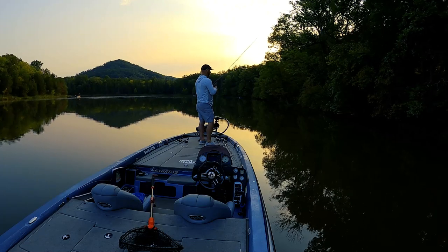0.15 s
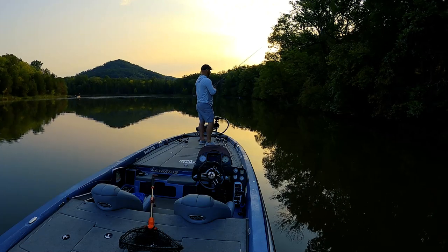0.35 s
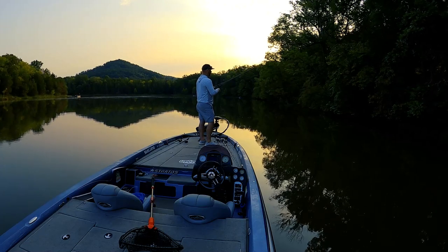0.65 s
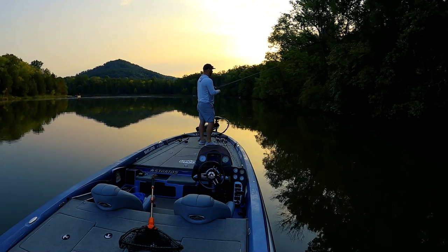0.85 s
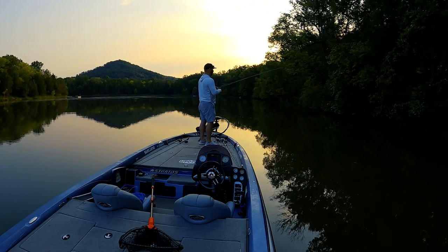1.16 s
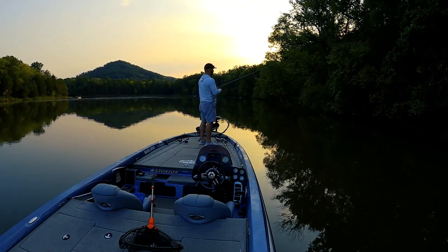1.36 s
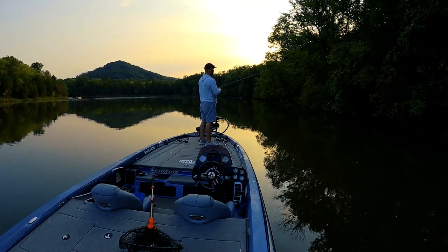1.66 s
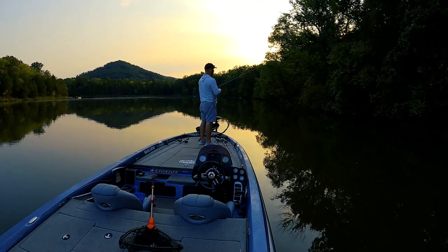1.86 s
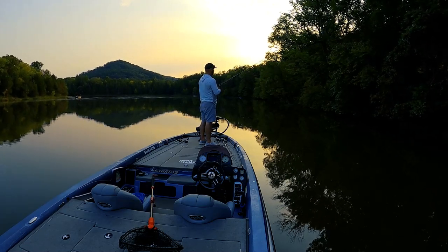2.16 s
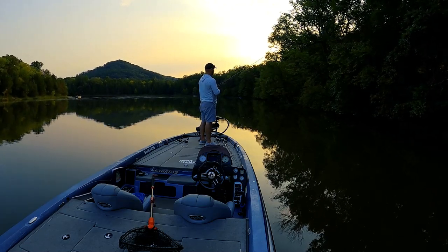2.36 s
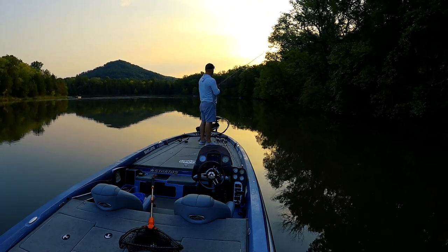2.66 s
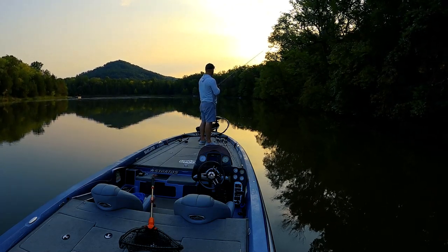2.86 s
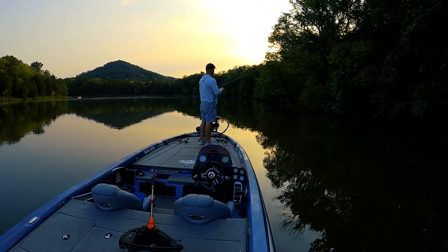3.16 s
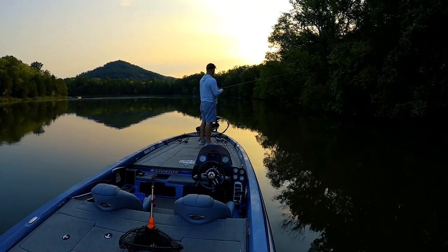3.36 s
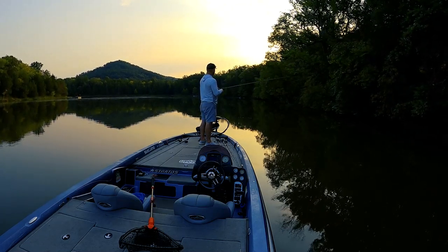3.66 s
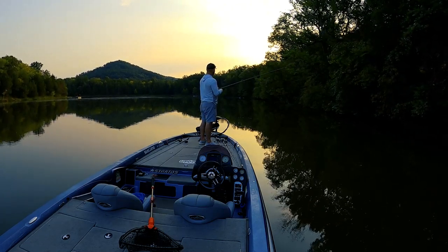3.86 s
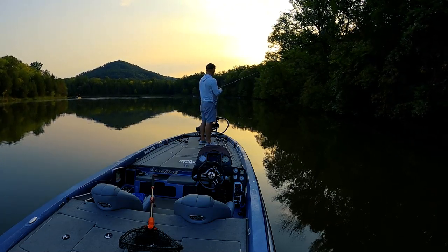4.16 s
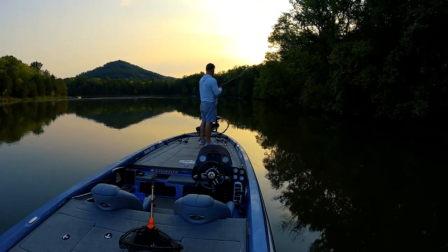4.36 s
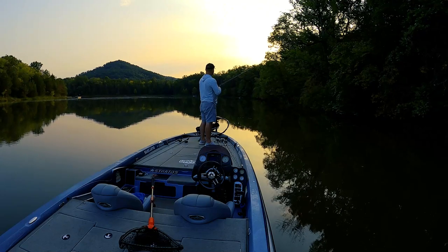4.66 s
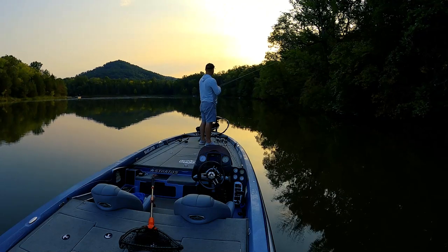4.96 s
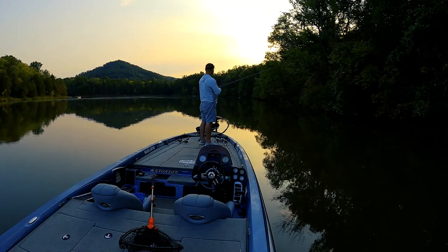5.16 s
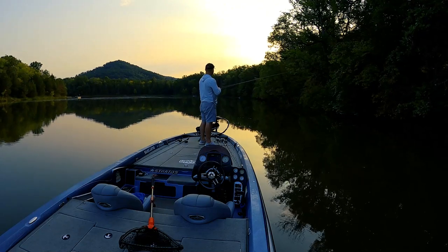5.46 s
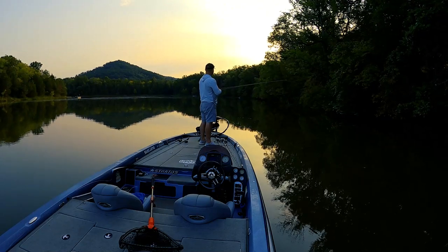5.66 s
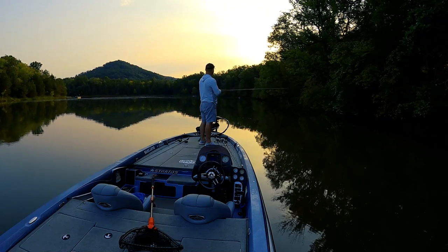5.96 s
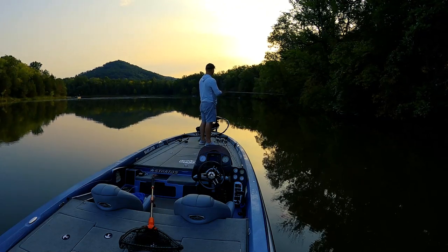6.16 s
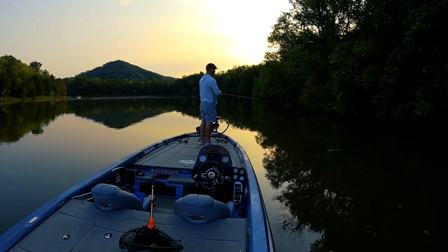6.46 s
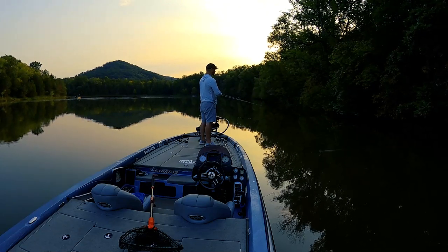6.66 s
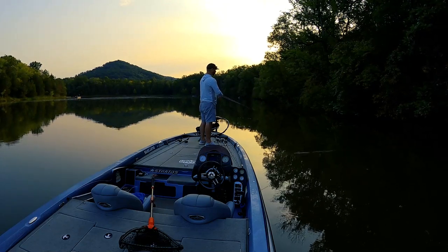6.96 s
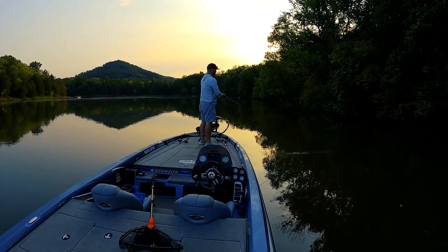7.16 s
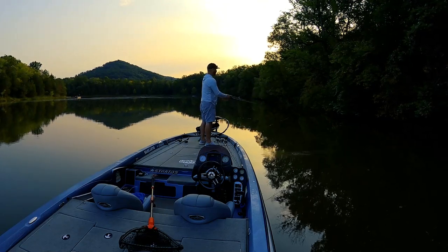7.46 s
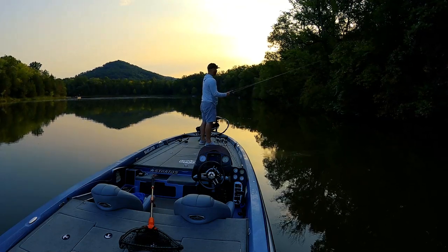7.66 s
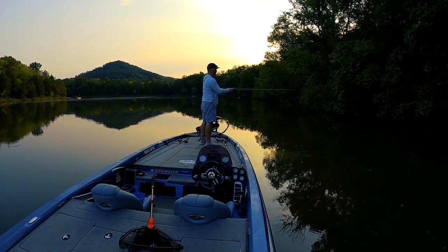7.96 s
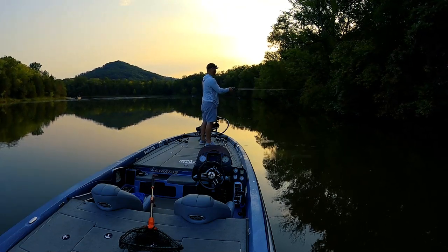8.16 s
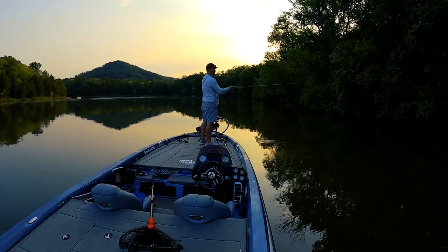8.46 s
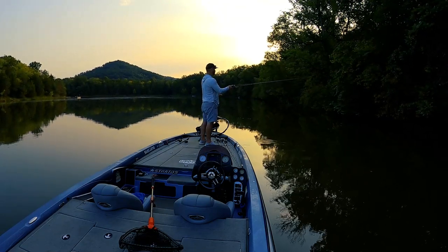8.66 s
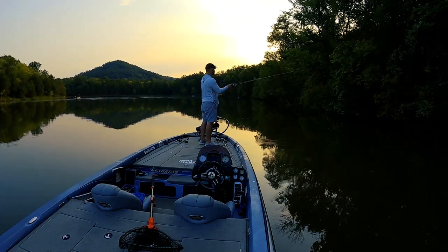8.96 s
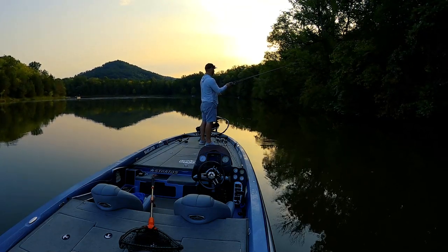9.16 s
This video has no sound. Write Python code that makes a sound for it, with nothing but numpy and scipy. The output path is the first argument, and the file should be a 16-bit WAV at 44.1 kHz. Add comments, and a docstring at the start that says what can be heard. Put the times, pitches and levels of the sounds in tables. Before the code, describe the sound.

A steady high insect chorus, scattered bird calls and low distant rumble, then a small splash, reel clicks and a fishing cast close by.

```python
"""Crickets and katydids scrape their wings all along a wooded lake shore at dusk, heard in stereo
from a fishing boat on calm water. Close by on the bow an angler lifts the lure out with a splash, clicks
the reel and casts again: the line hisses and the rod swishes. A jay and small songbirds call from
the trees to the left, and a far motor hums and rumbles over the water, under a hush of evening air."""
import sys
import numpy as np
from scipy import signal
from scipy.fft import rfft, irfft
from scipy.io import wavfile
from scipy.ndimage import uniform_filter1d

SR = 44100
rng = np.random.default_rng(int(sys.argv[2]) if len(sys.argv) > 2 else 0)


def put_to_file(sound):
    """Save the sound as 16-bit audio at rate SR, in the file named by the first command-line argument."""
    columns = np.atleast_2d(sound).T  # one column per channel
    safe = np.clip(columns, -1, 1)
    whole_steps = np.round(safe * 32767)
    wavfile.write(sys.argv[1], SR, whole_steps.astype(np.int16))


N = 410571
TIME = np.arange(N) / SR
FREQS = np.maximum(np.fft.rfftfreq(N, 1 / SR), 1)
# eddies off the rod tip, back swing then forward swing: time_s, tip_hz, whistle_db
ROD_SWING = [(7.645, 6800, -65), (7.69, 9560, -63.5), (7.755, 12800, -72), (7.81, 10220, -63.5),
             (7.85, 8360, -64), (7.9, 10150, -58.5), (7.95, 14400, -65.5), (8.06, 7900, -70)]


def insects():
    """Countless wings on the far shore merge into a shimmer; nearer crickets chirp almost pure tones."""
    # spectrum of the chorus: frequency_hz, level_db
    chorus = [(3700, -58), (4150, -17.5), (4500, -5.5), (4850, 2.5), (5250, 3), (5650, 1.5), (6600, -7),
              (7000, -16), (7600, -25), (8500, -54)]
    # nearer crickets: pitch_hz, chirps_per_s, level_db, pan_db
    crickets = [(5140, 7.3, -68.5, -6.5), (5300, 11, -70.5, -0.5), (5560, 14, -71, 4), (6470, 5, -80, 3)]
    out = noise(at_hz(chorus), likeness=0.36) * from_db(-54.5 + 0.7 * drift(15))
    for hz, chirps_per_s, level_db, pan_db in crickets:
        chirps = np.maximum(np.sin(phase_of(chirps_per_s * (1 + 0.1505 * drift(4)))), 0)
        tones = np.array([np.sin(phase_of(hz * (1 + .006 * drift(25)))) for side in range(2)])
        out += panned(rms_one(chirps * tones), pan_db) * from_db(level_db + 1.7 * drift(7.4))
    return out


def katydid(every_s=.2805, scrape_s=.1):
    """Each high chirp is a scrape of the file that rings a narrow wing resonance."""
    # loudness of the chirping: time_s, level_db
    loudness = [(.5, -87), (2.2, -79.5), (5.3, -77.5), (8.6, -82)]
    scraping = (TIME - .92 + .022 * drift(3)) % every_s < scrape_s
    wing = noise(resonance(7830, width_hz=120), likeness=0.095)
    return wing * uniform_filter1d(from_db(in_time(loudness)[0]) * scraping, size=1700)


def reel_clicks(attack_s=0.0003, rattle_s=0.0094, spark_s=0.0058):
    """Close to the microphones the clutch snaps and rings the reel body; loose parts rattle after it."""
    # snaps of the clutch: start_s, level_db, tilt_db_per_octave
    clicks = [(7.4897, -28, 3), (7.557, -45, 9.5), (9.168, -55.5, 16.5), (9.213, -42, -1.5)]
    # modes of the reel body: pitch_hz, level_db, decay_s
    modes = [(1630, 0.5, 0.0012), (2700, -13.5, 0.0047), (4120, -12, 0.0036), (5500, 2, 0.00057),
             (6650, -7, 0.0008)]
    out, t = np.zeros((2, N)), TIME[:SR // 20]
    rattle_band = signal.butter(2, [1100, 5500], "band", fs=SR, output="sos")
    for start_s, level_db, tilt_db in clicks:
        ring = 0
        for hz, mode_db, decay_s in modes:
            gain = from_db(mode_db + tilt_db * np.log2(hz / 4000))
            ring += gain * np.sin(2 * np.pi * hz * t) * np.exp(-t / decay_s)
        white = rng.standard_normal((2, len(t)))
        rattle = from_db(-17) * rms_one(signal.sosfilt(rattle_band, white)) * np.exp(-t / rattle_s)
        # bright clicks carry a spark of treble
        spark = from_db(-4 + 2 * (tilt_db - 15.5)) * white * np.exp(-t / spark_s)
        add(out, start_s, from_db(level_db) * (1 - np.exp(-t / attack_s)) * (ring + spark + rattle))
    return out


def splash_and_cast(release_s=7.3, payout_db=-70, fade_db_per_s=16, shaft_share=0.0774):
    """Off the bow the lure splashes out; then line hisses through the guides and the rod swishes."""
    # bursts of hiss and swish, the lure splashing out, then rod strokes:
    # peak_s, half_length_s, hiss_db, swish_db
    bursts = [(6.545, 0.064, -64.5, -77), (6.996, 0.05, -65.5, -84), (7.723, 0.03, -69, -60),
              (7.783, 0.05, -59.5, -64.5), (7.951, 0.044, -57, -53.5), (8.124, 0.032, -62.5, -74),
              (9.232, 0.035, -63, -62.5)]
    # spectra of the hiss and the swish: frequency_hz, level_db
    hiss_spectrum = [(700, -18), (1500, -2), (4500, 7), (9000, -8.5), (12500, -14.5), (15000, -32)]
    swish_spectrum = [(150, -9), (450, 3), (800, -8), (2400, -2.5), (3800, -4), (6000, -27), (13000, -44)]
    hiss_gain = from_db(payout_db - fade_db_per_s * np.abs(TIME - release_s)) * (TIME > release_s)
    swish_gain = 0
    for peak_s, half_s, hiss_db, swish_db in bursts:
        burst = surge(peak_s, half_s)
        hiss_gain = np.hypot(hiss_gain, from_db(hiss_db) * burst)
        swish_gain = np.hypot(swish_gain, from_db(swish_db) * burst)
    grain = from_db(4 * np.tanh(drift(350)))
    hiss = noise(at_hz(hiss_spectrum), likeness=0.25, distant=False) * hiss_gain * grain
    # eddies leave the thick shaft at a rate that follows the rod's speed
    eddy_s = 1 / (shaft_share * in_time(ROD_SWING)[0])
    air = noise(at_hz(swish_spectrum), likeness=0.73, distant=False)
    delayed = np.array([np.interp(TIME - eddy_s, TIME, side) for side in air])
    swish = rms_one(air + .5 * delayed) * swish_gain * grain
    return panned(hiss, pan_db=-5) + swish


def spool():
    """The spool whirs briefly after the cast, its pitch rising and falling with its spin."""
    spin = surge(peak_s=8.25, half_s=0.049)
    whir = breathy_tone(8600 * spin ** .08, width_hz=450)
    return panned(from_db(-73) * spin * whir, pan_db=-5)


def rod_whistle():
    """Each section of the swung rod sheds eddies at its own pitch, highest towards the tip."""
    tip_hz, level_db = in_time(ROD_SWING)
    swinging = (TIME > ROD_SWING[0][0]) & (TIME < ROD_SWING[-1][0])
    eddies = sum(breathy_tone(tip_hz * share, width_hz=530) for share in np.linspace(.55, .95, 4))
    return panned(rms_one(eddies) * from_db(level_db) * swinging, pan_db=-5)


def drips(decay_cycles=14, rise=0.073):
    """Each drop or slap of water traps a bubble whose pitch rises as it dies; large ones ring longer."""
    # drips on the lake and glugs under the hull: start_s, pitch_hz, level_db
    bubbles = [(.625, 544, -59), (6.667, 1266, -56), (6.705, 2040, -50.5), (7.006, 3100, -51),
               (9.293, 472, -52)]
    out, t = np.zeros(N), TIME[:SR // 5]
    for start_s, hz, level_db in bubbles:
        age = t * hz / decay_cycles
        tone = np.sin(phase_of(hz * (1 + rise * np.tanh(age / 2))))
        add(out, start_s, from_db(level_db) * tone * np.exp(-age) * (1 - np.exp(-8 * age)))
    return out


def lure_spray(start_s=6.48, spread_s=0.32, count=70, low_hz=1700, high_hz=3700, decay_cycles=2):
    """The lifted lure sheds droplets that patter on the lake, dense at first, then thinning out."""
    out, t = np.zeros(N), TIME[:SR // 20]
    for when, smallness, strength in rng.random((count, 3)):
        hz = low_hz * (high_hz / low_hz) ** smallness
        droplet = np.sin(2 * np.pi * hz * t) * np.exp(-t * hz / decay_cycles)
        level_db = -70 + 20 * strength ** 2 - 10 * when
        add(out, start_s + spread_s * when ** 1.4, from_db(level_db) * droplet)
    return out


def jay():
    """A nasal cry from the trees, sounding on its second to fourth partials."""
    # cries: start_s, fundamental_hz, fourth_partial_db, second_partial_db
    cries = [(0.973, 814.6, -61.5, -76), (1.342, 811, -64, -75.5), (3.6, 807, -65, -77.5),
             (4, 802.4, -66.5, -79), (7.207, 814, -72, -75), (7.595, 813, -71, -76)]
    # a short yelp, a catch, then a held note that sags: time_s, pitch_ratio, gain_db
    cry_shape = [(0, 1, 4), (.035, 1, 1), (.055, 1, -12), (.085, 1, 0), (.14, .988, 0), (.205, .95, 1)]
    out = np.zeros(N)
    for start_s, hz, fourth_db, second_db in cries:
        partials = [(4, fourth_db), (3, second_db - 4.5), (2, second_db)]
        contour = [(t, hz * ratio, db) for t, ratio, db in cry_shape]
        add(out, start_s, bird_note(contour, partials, waver=0.009, flutter_db=3.5))
    return out


def songbirds():
    """Each whistled note bends smoothly through three pitches: an arch, a scoop or a quick fall."""
    # notes: start_s, length_s, start_hz, middle_hz, end_hz, level_db
    notes = [(.125, 0.24, 2760, 3250, 2504, -73), (.535, .08, 1980, 1500, 1680, -77),
             (0.656, 0.15, 4560, 3810, 2990, -65), (.93, 0.056, 3340, 3680, 2760, -62),
             (1.05, 0.15, 2300, 3130, 2804, -64), (1.518, 0.017, 3050, 2894, 2750, -60.5),
             (1.546, 0.023, 5420, 4250, 2900, -62), (4.565, 0.038, 3390, 3640, 3660, -65),
             (4.599, .027, 3650, 2730, 2150, -68), (5.152, .043, 3100, 3420, 3720, -64),
             (5.186, .12, 3520, 3305, 3250, -65), (5.265, .13, 3360, 2815, 2315, -69.5),
             (8.684, .045, 4080, 3880, 3990, -66), (8.727, .088, 4000, 3400, 3350, -67),
             (8.989, .04, 3270, 3450, 3750, -71), (9.093, 0.08, 1880, 2566, 2950, -71),
             (9.166, .07, 3550, 3170, 2850, -71)]
    out = np.zeros(N)
    for start_s, length_s, *pitches, level_db in notes:
        bend = np.polyfit([0, .5, 1], pitches, 2)
        contour = [(u * length_s, np.polyval(bend, u), level_db) for u in np.linspace(0, 1)]
        add(out, start_s, bird_note(contour))
    return out


def far_songbird(every_s=.41, glide_s=.045):
    """Deeper in the woods a bird repeats three whistled glides at an even pace."""
    # phrases: start_s, repeats, level_db
    phrases = [(0.324, 3, -68), (6.924, 3, -64)]
    # two falling slurs and an upward scoop: after_s, length_s, from_hz, towards_hz, gain_db
    motif = [(0, .055, 4750, 3150, -4.5), (.112, .075, 3050, 2520, -3), (.29, .07, 1650, 2950, -8.5)]
    out = np.zeros(N)
    for start_s, repeats, level_db in phrases:
        for motif_s in start_s + every_s * np.arange(repeats):
            for after_s, length_s, from_hz, to_hz, gain_db in motif:
                glide = [(t, to_hz + (from_hz - to_hz) * np.exp(-t / glide_s), level_db + gain_db)
                         for t in np.linspace(0, length_s)]
                add(out, motif_s + after_s, bird_note(glide))
    return out


def woods(call, tail_db, left_lag_s=.00006):
    """On the shore to the left, leaves blur each note and the trunks scatter a longer tail."""
    t = TIME[:2 * SR]

    def scattered(t60_s):
        echoes = rng.standard_normal((2, len(t))) * from_db(-60 * t / t60_s)
        return signal.fftconvolve(call[None], rms_one(echoes) / np.sqrt(len(t)), axes=1)[:, :N]

    direct = np.array([np.interp(TIME - left_lag_s, TIME, call), call])
    leaves = from_db(-5) * scattered(t60_s=.14)
    trunks = from_db(tail_db) * scattered(t60_s=1.4)
    return panned(direct + leaves, pan_db=14.5) + panned(trunks, pan_db=15.5)


def motor(firing_hz=73.8, octave_hz=145, hold_s=0.25, fade_db_per_s=12.5):
    """Far across the water, a wavering exhaust note and its octave over rumble that swells and fades."""
    # swells of the low boom, the rumble and the upper rumble, each scaled below: time_s, level_db
    boom_swells = [(0, -42.5), (0.4, -37.5), (0.8, -48), (1.6, -48), (2.0, -51), (2.75, -62), (2.87, -41.5),
                   (3.05, -69), (3.3, -49.5), (3.7, -63.5), (5.4, -58), (7.1, -69), (8.45, -61),
                   (8.63, -53.5), (9.0, -65.5)]
    rumble_swells = [(0.35, -53), (0.62, -59), (0.9, -57.5), (1.45, -49.5), (2.2, -53), (3.9, -51.5),
                     (4.45, -56), (4.7, -49), (6.4, -51), (7.05, -50.5), (7.45, -58.5), (7.72, -51.5),
                     (8.2, -63.5), (8.85, -53)]
    upper_swells = [(0, -71), (0.35, -59.5), (0.58, -72), (0.88, -52.5), (1.15, -63.5), (1.42, -53),
                    (2.0, -60.5), (2.3, -68.5), (3.4, -65.5), (3.65, -61), (4.05, -58), (4.3, -76),
                    (5.0, -61.5), (5.8, -76), (9.31, -67)]
    boom_db, rumble_db, upper_db = in_time(boom_swells) + in_time(rumble_swells) + in_time(upper_swells)
    boom_db = -60.5 + 0.59 * (boom_db - boom_db.mean())
    # the exhaust note holds, then sinks to a faint hum
    exhaust_db = np.maximum(-44 - fade_db_per_s * np.maximum(TIME - hold_s, 0), -83.5)
    speed = 1 + 0.016 * drift(14)
    exhaust = from_db(exhaust_db + 0.76 * drift(27)) * np.sin(phase_of(firing_hz * speed))
    octave = from_db(rumble_db - 8.5 + 2 * drift(10)) * np.sin(phase_of(octave_hz * speed))
    boom = noise(resonance(82.5, width_hz=19), likeness=0.97) * from_db(boom_db + 3.9 * drift(14))
    hump = resonance(148, width_hz=39) + resonance(202.3, width_hz=42)
    rumble = noise(hump, likeness=0.92) * from_db(rumble_db - 4.5 + 1.67 * drift(9))
    upper = noise(resonance(232, width_hz=48.5), likeness=0.95)
    upper *= from_db(upper_db - 0.74 + 2.85 * drift(12))
    return panned(np.sqrt(2) * (exhaust + octave), pan_db=1) + boom + rumble + upper


def evening_air():
    """A soft, steady hush all round the boat."""
    # spectrum of the hush: frequency_hz, level_db
    hush = [(300, 10), (450, 6), (750, -1.5), (1250, 4), (2450, -3), (3450, 1.5), (4100, -3.5),
            (8500, -14.5), (10200, -14.5), (11000, -20.5), (12300, -16), (13200, -48)]
    return noise(at_hz(hush), likeness=0.32) * from_db(-64)


def bird_note(contour, partials=((1, 0),), waver=0.0263, flutter_db=2.5):
    """One slightly unsteady note that swells and fades along rows of time_s, pitch_hz, level_db."""
    t = np.arange(contour[0][0], contour[-1][0], 1 / SR)
    hz, level_db = in_time(contour, t)
    wobble, flutter = [np.interp((t - t[0]) * 130, np.arange(len(t)), knots)
                       for knots in rng.standard_normal((2, len(t)))]
    phase = phase_of(hz * (1 + waver * wobble))
    swell = np.sqrt(np.abs(np.sin(np.linspace(0, np.pi, len(t)))))
    tone = sum(from_db(db) * np.sin(harmonic * phase) for harmonic, db in partials)
    return np.sqrt(2) * tone * swell * from_db(level_db + flutter_db * flutter)


def noise(colour_db, likeness, distant=True):
    """Stereo noise of rms 1; likeness is the share of power common to both microphones."""
    # distant sound takes on the shore's balance: frequency_hz, left_over_right_db
    shore_balance = [(180, 0.5), (550, -3), (1100, 0.5), (3600, 7), (4500, -0.5), (5100, 1.5), (6000, 5),
                     (7500, 9), (8500, -1)]
    # and its phase between the microphones: frequency_hz, left_lead_rad
    shore_phase = [(200, 0), (600, -1), (4000, 0.5), (4500, -2), (5800, -3), (6900, -2.5)]
    common, left, right = rfft(rng.standard_normal((3, N)))
    pair = np.sqrt(likeness) * common + np.sqrt(1 - likeness) * np.array([left, right])
    pair *= from_db(colour_db)
    if distant:
        lean = from_db(at_hz(shore_balance) / 2) * np.exp(.5j * at_hz(shore_phase))
        pair *= np.array([lean, 1 / lean])
    return rms_one(irfft(pair, N))


def breathy_tone(hz, width_hz):
    """A narrow band of close noise that follows a pitch curve."""
    return noise(resonance(0, width_hz), likeness=0, distant=False) * np.sin(phase_of(hz))


def surge(peak_s, half_s):
    """A smooth rise and fall; 1 at its peak."""
    return np.exp(1 - np.hypot(1, (TIME - peak_s) / half_s))


def from_db(db):
    """Decibels to gain."""
    return 10 ** (np.asarray(db) / 20)


def rms_one(x):
    """Scale to unit power."""
    return x / np.sqrt(np.mean(x ** 2) + 1e-20)


def in_time(rows, t=TIME):
    """Each column of a curve, read at the times t."""
    time_s, *columns = np.transpose(rows)
    return [np.interp(t, time_s, column) for column in columns]


def at_hz(points):
    """A spectrum read on a log-frequency axis."""
    hz, value = np.transpose(points)
    return np.interp(np.log(FREQS), np.log(hz), value)


def resonance(hz, width_hz):
    """A peak with steep skirts, in dB at every frequency."""
    return -20 * np.log10(1 + ((FREQS - hz) / width_hz) ** 2)


def drift(rate_hz):
    """A random wander with a spread of about one."""
    return np.interp(TIME * rate_hz, np.arange(N), rng.standard_normal(N))


def phase_of(hz):
    """Phase of an oscillator that follows a pitch curve."""
    return 2 * np.pi * np.cumsum(hz) / SR


def add(track, start_s, sound):
    """Mix a short sound into a track."""
    i = max(round(start_s * SR), 0)
    track[..., i:i + sound.shape[-1]] += sound[..., :max(N - i, 0)]


def panned(x, pan_db):
    """Left louder than right by pan_db."""
    return x * from_db(np.array([[pan_db], [-pan_db]]) / 2)


def scene():
    """From the boat: the shore and the motor far off, the angler and the water close by."""
    air = evening_air()
    birds = woods(songbirds(), tail_db=-3) + woods(jay(), tail_db=-2) + woods(far_songbird(), tail_db=2)
    distance = insects() + katydid() + birds + motor() + air
    angler = splash_and_cast() + spool() + rod_whistle() + reel_clicks()
    return distance + angler + drips() + lure_spray()


def record(dry, cutoff_hz=15800):
    """The top of the treble is cut steeply."""
    return signal.sosfilt(signal.cheby2(12, 70, cutoff_hz, fs=SR, output="sos"), dry)


dry = scene()
out = record(dry)
put_to_file(out)
```